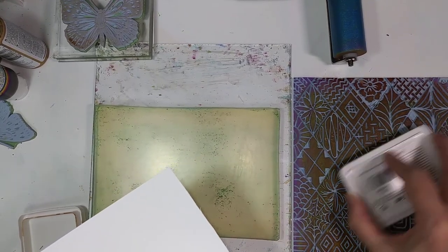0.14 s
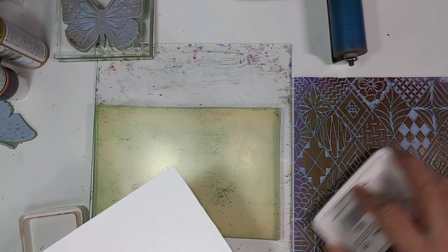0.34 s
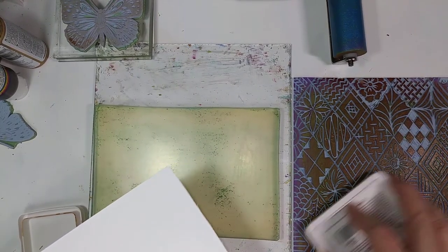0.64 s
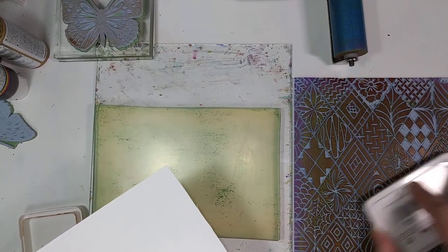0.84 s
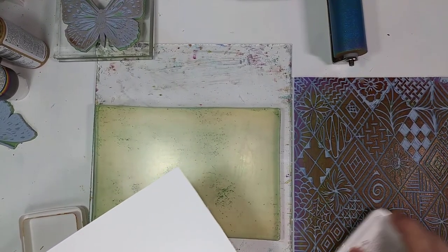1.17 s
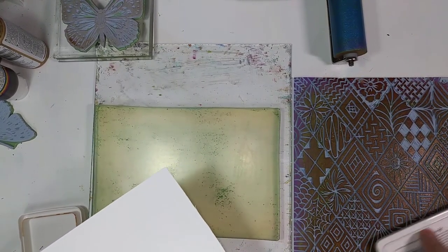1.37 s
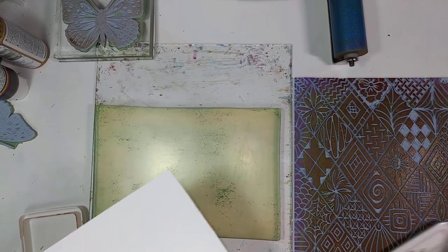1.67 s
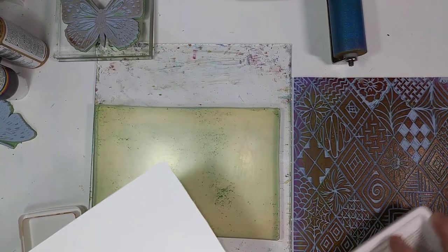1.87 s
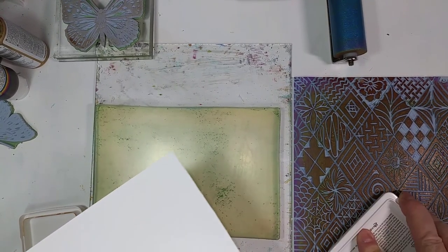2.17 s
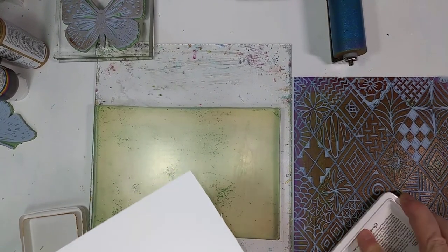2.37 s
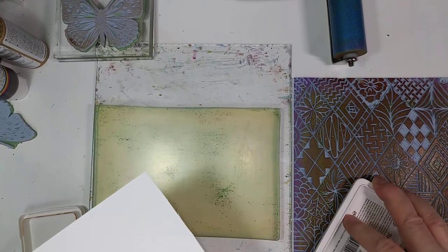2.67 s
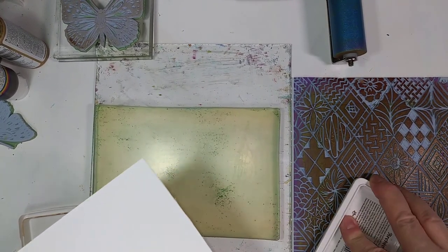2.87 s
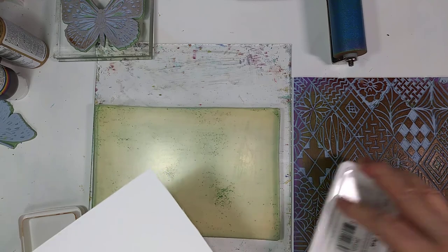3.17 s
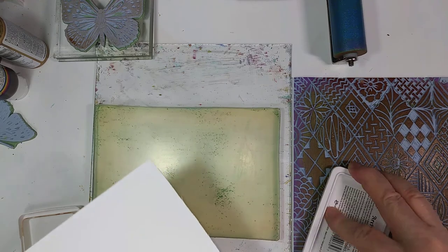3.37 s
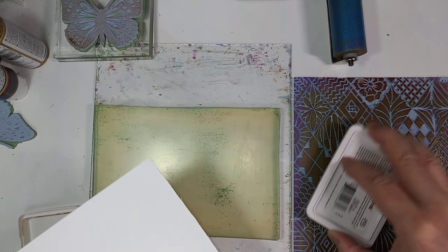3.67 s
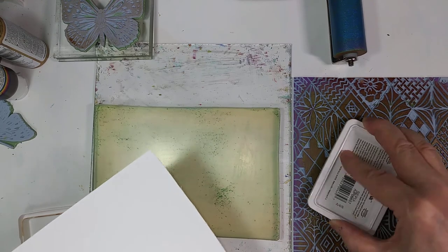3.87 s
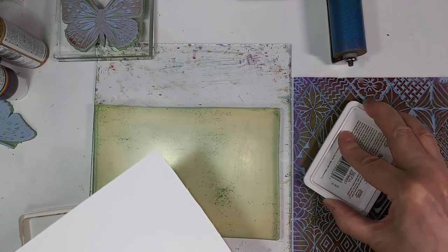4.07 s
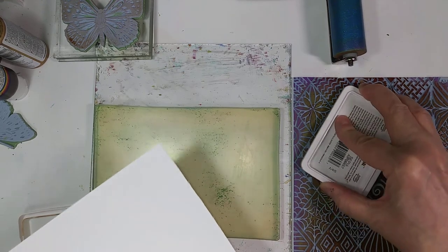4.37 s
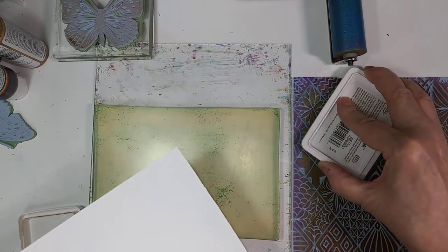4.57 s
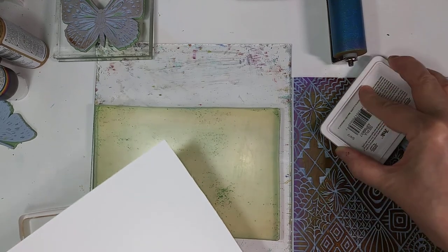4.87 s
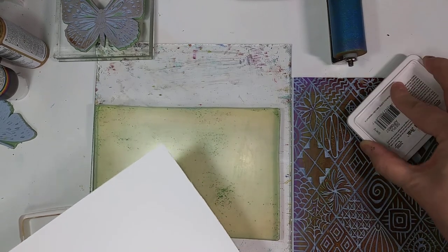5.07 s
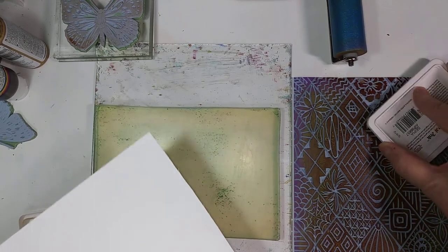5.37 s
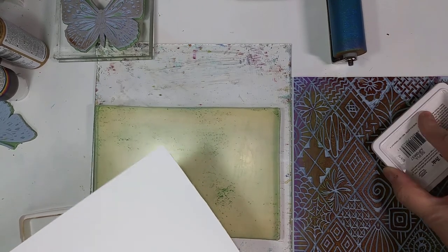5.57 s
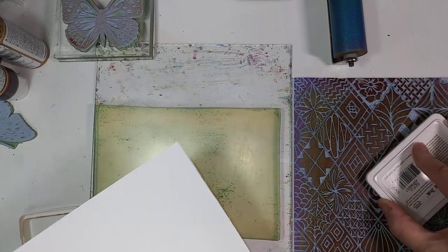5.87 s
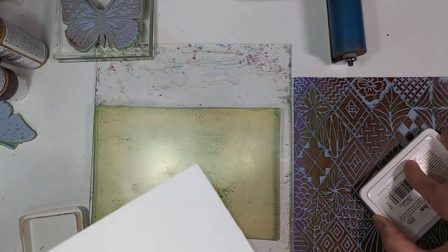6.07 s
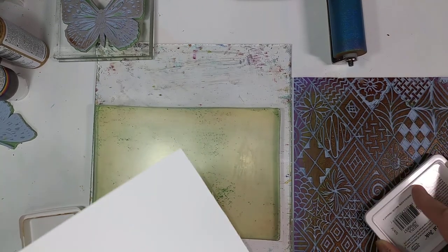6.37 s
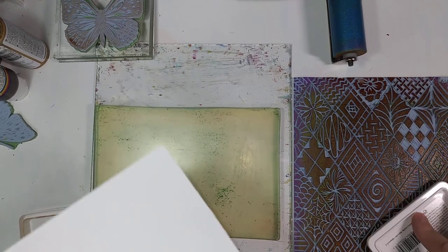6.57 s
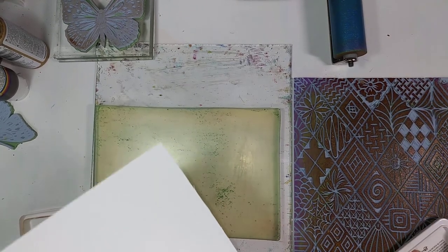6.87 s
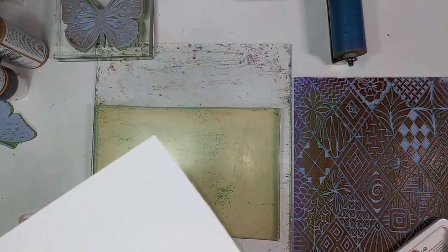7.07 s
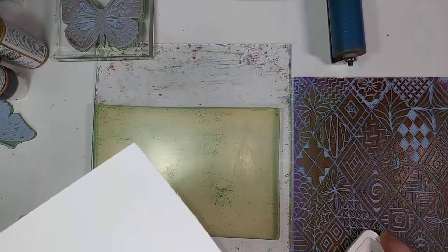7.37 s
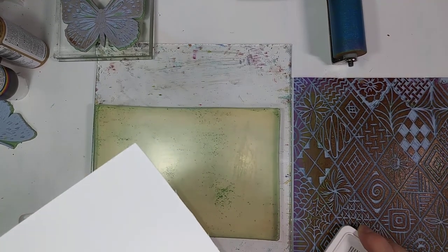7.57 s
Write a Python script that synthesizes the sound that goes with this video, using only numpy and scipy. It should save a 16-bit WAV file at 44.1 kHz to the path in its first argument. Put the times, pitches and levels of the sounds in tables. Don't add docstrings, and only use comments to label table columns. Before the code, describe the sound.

Close by in a small room, hissing ridged rubs give way to about twenty firm dabs, each a plastic clack and dull thump.

```python
import sys
import numpy as np
from scipy import signal
from scipy.io import wavfile
from scipy.ndimage import uniform_filter1d

SR = 44100
rng = np.random.default_rng(int(sys.argv[2]) if len(sys.argv) > 2 else 0)


def bounce(signal):
    frames = np.transpose(np.atleast_2d(signal))
    limited = np.clip(frames, -1, 1)
    pcm = np.round(limited * 32767).astype(np.int16)
    wavfile.write(sys.argv[1], SR, pcm)


def voltage_ratio(decibels):
    exponent = np.asarray(decibels, float) / 20
    return 10 ** exponent


N = 340893
SPAN = 4096


def rms1(x):
    return x / np.sqrt(np.mean(x ** 2))


def band(x, hz, width):
    return signal.lfilter(*signal.iirpeak(hz, hz / width, fs=SR), x)


def steep(x, hz, width):
    return band(band(x, hz, 1.68 * width), hz, 1.68 * width)


def soft(x, hz, leak_db):
    return signal.sosfilt(signal.butter(4, hz, fs=SR, output="sos"), x) + voltage_ratio(leak_db) * x


def peak(x, db):
    return x * voltage_ratio(db) / np.abs(x).max()


def walk(rate):
    hold = int(SR / rate)
    steps = np.repeat(rng.standard_normal(N // 40), hold)[:N]
    return 0.48 * uniform_filter1d(uniform_filter1d(steps, hold), hold)


def add(out, s, hit):
    i = int(s * SR)
    out[i:i + len(hit)] += hit[:N - i]


def strokes(t):
    # fastest at t/s, speeds up/s, slows down/s, hiss/dB, hum over hiss/dB
    swings = [(0.046, 0.1, 0.11, -40.5, -9), (.24, 0.12, 0.1, -41, -10.5), (0.416, 0.11, 0.11, -38.5, -7),
              (.665, 0.2, 0.11, -41.5, -7.5), (0.849, 0.11, 0.092, -38.5, -11.5),
              (1.06, 0.17, 0.11, -40.5, -11), (1.289, 0.15, 0.089, -40, -8.5),
              (1.497, 0.16, 0.12, -42, -9.5), (1.695, 0.13, 0.084, -42, -7.5),
              (1.825, 0.078, 0.037, -53, -25), (2.95, 0.086, 0.04, -54, -5), (3.035, .02, .02, -56.5, -12),
              (4.965, .025, 0.016, -55, -20), (5.19, 0.0088, 0.025, -58, 5), (5.762, .02, 0.057, -62, 10)]
    # t/s, weight/dB
    weight = [
        (0, -56),
        (.13, -62),
        (.25, -60.5),
        (.43, -53),
        (.53, -65),
        (.75, -75.5),
        (1.198, -71),
        (1.65, -61.5),
        (1.9, -86),
    ]
    hiss_power, hum_power, rim_power = 1.95, 1, .3
    rim_db, rim_eases_s, rim_eased_db = -54, .68, -10
    hiss, hum, rim = np.zeros((3, N))
    for s, rise, fall, db, hum_db in swings:
        away = np.where(t < s, (s - t) / rise, (t - s) / fall)
        speed = np.cos(np.pi / 2 * np.clip(away, 0, 1)) ** 2
        hiss += voltage_ratio(db) * speed ** (hiss_power / 2)
        hum += voltage_ratio(db + hum_db) * speed ** (hum_power / 2)
        rim += voltage_ratio(rim_db + db + 39 + rim_eased_db * (s > rim_eases_s)) * speed ** (rim_power / 2)
    s, db = np.transpose(weight)
    drag = voltage_ratio(np.interp(t, s, db)) * np.clip((s[-1] - t) / 0.046, 0, 1)
    return hiss, hum, drag, rim


def rub():
    # f/Hz, width/Hz, level/dB
    felt_modes = [(2100, 1530, 0), (2540, 990, 1.5), (3082, 570, 7.5), (3870, 570, 1.5), (4860, 620, -29),
                  (5440, 914, 11), (6740, 680, 2), (7800, 2100, -9.5), (12100, 830, -26),
                  (13600, 1800, -36)]
    hum_modes = [(430, 64, 0), (670, 83, -2.5), (800, 150, 7), (994, 160, 11.5)]
    drag_modes = [(323, 36, 0)]
    rim_modes = [(1590, 150, 0)]
    chance = rng.standard_normal((4, N))
    slips = chance[0] * voltage_ratio(0.8 * rng.exponential(size=N)) * voltage_ratio(2.3 * walk(400))
    hiss_level, *other_levels = strokes(np.arange(N) / SR)
    fast = hiss_level / hiss_level.max()
    hiss = 0
    for hz, width, db in felt_modes:
        ring = voltage_ratio(db + 1.2 * walk(39.75)) * rms1(steep(slips, hz, width))
        hiss = hiss + ring * np.sqrt(width) * fast ** (0.39 * hz / 8000)
    out = hiss_level * hiss / np.sqrt(np.mean(hiss[fast > .5] ** 2))
    for level, noise, modes in zip(other_levels, chance[1:], (hum_modes, drag_modes, rim_modes)):
        rings = sum(voltage_ratio(db + 1.5 * walk(21)) * rms1(steep(noise, hz, width)) for hz, width, db in modes)
        out = out + level * rms1(rings)
    return out


def room():
    # f/Hz, density/dB per Hz
    spectrum = [(30, -29), (54, -6), (98, -3.5), (239, -6.5), (311, -5.5), (345, -23), (384, -9.5),
                (473, -6.5), (584, -12.5), (1010, -12), (1160, -13), (1250, -10), (2410, -23.5),
                (3670, -20.5), (16000, -41.5)]
    hz, db = np.transpose(spectrum)
    out, swell = 0, walk(2.73)
    for f in 40 * 2 ** np.arange(0, 8.8, .5):
        gain = np.interp(np.log(f), np.log(hz), db) + 2.0 * swell + 7.6 * walk(25)
        out = out + voltage_ratio(gain) * steep(rng.standard_normal(N), f, f / 3)
    return rms1(out) * voltage_ratio(-55)


def crack_rows():
    # t/s, peak/dB, strongest f/Hz, brightness/dB, room send/dB
    landings = [(2.0164, -9, 1590, -12.5, -3.5), (2.6768, -9.5, 5280, -7.5, -3.5),
                (3.25, -16, 2500, -8, 3.5), (3.5749, -11, 2540, -13, -1.5), (3.7808, -13, 1300, -10.5, 2),
                (3.7832, -21, 2230, -9, 3), (4.0357, -24.5, 2420, -8, 6), (4.0423, -25, 1990, -10, 2),
                (4.3046, -20, 1470, -17, 1.5), (4.564, -22, 4940, -30, -5), (4.8018, -22, 5150, -32, -7),
                (5.0467, -20, 2030, -13, 1.5), (5.294, -14.5, 2020, -8.5, -0.5),
                (5.5537, -15, 2100, -10.5, 1.5), (5.8112, -5.5, 2050, -5, -3.5),
                (6.0433, -20, 3240, -17, 2), (6.2805, -21, 2860, -18.5, 14.5), (6.2846, -5, 1600, -15, -1),
                (6.536, -6.5, 1700, -23, -3), (6.8341, -12, 5340, 2.5, 2.7), (6.8363, -18, 1360, -14, -10),
                (7.336, -33, 3170, 20.5, 11), (7.3414, -22.5, 2830, -13, 7), (7.5975, -26, 1440, -11, 5)]
    # t/s, peak/dB, strongest f/Hz, brightness/dB
    clicks = [(2.2897, -44, 1640, -21), (2.407, -44.5, 5600, -6), (2.4997, -46, 2500, -25),
              (2.556, -51, 1720, -20), (2.718, -39, 1410, -6), (2.9405, -45, 2520, -16),
              (3.381, -44, 1520, -13), (4.2986, -36, 2970, -6), (4.4022, -37.5, 2940, -2),
              (4.5715, -31, 2860, -21), (4.659, -47, 5470, 0), (4.824, -41, 1680, -7),
              (4.8423, -35, 1620, -20), (5.185, -55, 1430, 8), (5.9234, -43, 1930, -23),
              (6.134, -44.5, 3360, 15), (6.8454, -29, 2100, -2), (7.3804, -32, 1650, -26),
              (7.5028, -43, 1570, -14)]
    click_send_db = 2
    rows = [*landings] + [(*click, click_send_db) for click in clicks]
    return [(s, db, hz, top_db, 1.21 + 0.0134 * (db + 28), send) for s, db, hz, top_db, send in rows]


def cracks():
    # t/s, peak/dB, strongest f/Hz, brightness/dB, fade/ms, room send/dB
    skims = [
        (1.812, -43.5, 5800, 4, 24, -9),
        (5.752, -43.5, 1900, -26, 12, -9),
    ]
    # f/Hz, width/Hz, level/dB
    rattle = [(1770, 1310, 12.5), (2700, 840, 8), (5070, 730, 11), (6670, 5900, -25), (9300, 12000, -29.5)]
    lead_s = .004
    out, t = np.zeros(N), np.arange(SPAN) / SR
    for row, noise in zip(crack_rows() + [*skims], rng.standard_normal((64, SPAN))):
        s, db, hz, top_db, fade_ms, _ = row
        burst = noise * (1 - np.exp(-t / 0.0024)) * np.exp(-t * 1000 / fade_ms)
        burst = np.roll(burst, int(lead_s * SR)) + voltage_ratio(-41.5) * noise * np.exp(-t / 0.0019)
        case = sum(voltage_ratio(g + (top_db + 11.0) * (f > 4000)) * steep(burst, f, width) for f, width, g in rattle)
        pure = voltage_ratio(14.0 - 0.17 * (db + 14)) * steep(burst, hz, 0.15 * hz)
        add(out, s - lead_s, peak(case + pure, db))
    return out


def thump_rows():
    # t/s, 280-600 Hz peak/dB, 600-1200 Hz peak/dB, strongest f/Hz, room send/dB
    landings = [(2.019, -11.5, -4.5, 917, 0.5), (2.681, -12.5, -12.5, 716, 4.5),
                (3.251, -17.5, -19.5, 407, 11.5), (3.576, -14.5, -12, 698, 6.5), (3.784, -4, -4.5, 474, 0),
                (4.036, -21, -20, 390, 9.5), (4.04, -13, -21, 374, 5.5), (4.305, -11.5, -13, 402, 3.5),
                (4.564, -15.5, -29, 438, 3), (4.574, -19, -22.5, 496, 6), (4.803, -16, -21, 382, 5.5),
                (5.047, -15, -19.5, 410, 6), (5.291, -10.5, -14, 385, 2.5), (5.556, -12.5, -10, 402, 3),
                (5.812, -7, -6, 517, -0.5), (6.043, -17.5, -15, 514, 4.5), (6.286, -9.5, -0.5, 976, 1.5),
                (6.537, -5, 2, 950, -2.5), (6.835, -16, -12, 285, 9), (7.342, -13, -16.5, 403, 8.5),
                (7.379, -31, -23.5, 283, 9.5), (7.596, -6.5, -13.5, 377, -1.5)]
    # t/s, 280-600 Hz peak/dB, strongest f/Hz, table top/dB
    touches = [(2.289, -36.5, 362, -57), (4.299, -30, 285, -33), (4.793, -39, 347, -49),
               (5.038, -23, 403, -46), (5.281, -30, 400, -42), (5.746, -42, 619, -57.5),
               (5.757, -31, 640, -38.5), (5.924, -34, 416, -49.5), (5.185, -43, 700, -60),
               (6.136, -35, 417, -43), (6.476, -40.5, 700, -62), (7.337, -19, 450, -32)]
    table_db, touch_upper_db, touch_send_db = -11, -10, -1.5
    rows = [(s, db, up, db + table_db, hz, send) for s, db, up, hz, send in landings]
    return rows + [(s, db, db + touch_upper_db, low, hz, touch_send_db) for s, db, hz, low in touches]


def thumps():
    # f/Hz, level/dB, t60/s
    body = [
        [(82, -9.5, .1), (145.3, 4, 0.14), (178.3, 6, 0.18), (231, -4, 0.1), (229, 13.5, 0.0067)],
        [(293, -4.5, 0.0065), (388, 1.5, 0.037), (487, -4.5, 0.034)],
        [(732, 5.5, 0.016), (866, 2.5, 0.021), (998, 11, 0.032)],
    ]
    edges = (75, 230, 520, 1150)
    early = (3.5, 1.4, 0.54)
    push_ms, lead_ms, lead_db = .55, 4.4, -23
    main_db, main_t60 = 4.5, 0.067
    out, t = np.zeros(N), np.arange(2 * SPAN) / SR
    for row, noise in zip(thump_rows(), rng.standard_normal((64, 2 * SPAN))):
        s, mid_db, up_db, low_db, hz, _ = row
        push = noise * t ** 2 * np.exp(-t * 1000 / push_ms)
        push = voltage_ratio(lead_db) * push + np.roll(push, int(lead_ms * SR / 1000))
        for k, (group, db) in enumerate(zip(body, (low_db - 4.5, mid_db - 4, up_db - 3))):
            shifts = 1 + .025 * noise[-9 * k - 9:]
            modes = [(f * shift, g, t60) for (f, g, t60), shift in zip(group, shifts)]
            if k == 1 + (hz > 600):
                modes.append((hz, main_db, main_t60))
            blow = 0
            for f, g, t60 in modes:
                mode = np.sin(2 * np.pi * f * t) * np.exp(-np.log(1000) * t / t60)
                blow = blow + peak(signal.fftconvolve(push, mode)[:len(t)], g)
            reach = signal.butter(2, [edges[k], edges[3]], "band", fs=SR, output="sos")
            add(out, s - (lead_ms + early[k]) / 1000, peak(signal.sosfilt(reach, blow), db))
    return out


def tack():
    # t/s, peak/dB
    ticks = [(2.0177, -36), (2.6787, -37), (3.2494, -26), (3.5752, -33.5), (3.6076, -52), (3.7517, -52),
             (3.7813, -30), (3.874, -47), (4.036, -47), (4.0715, -50), (4.2187, -56), (4.324, -42),
             (4.4018, -55), (5.0398, -54), (5.2927, -32.5), (5.5526, -57), (5.7447, -52), (5.811, -34),
             (6.2838, -26.5), (6.4162, -52), (6.535, -36.5), (6.5713, -54.5), (6.8352, -30), (7.3372, -37),
             (7.4214, -44), (7.594, -41), (7.6314, -50)]
    out, t = np.zeros(N), np.arange(SPAN // 8) / SR
    for (s, db), noise in zip(ticks, rng.standard_normal((64, SPAN // 8))):
        add(out, s, peak(steep(noise * np.exp(-t / 0.0012), 9600, 4000), db + 1.5))
    patter = (rng.random(N) < 70 / SR) * voltage_ratio(3.1 * rng.exponential(size=N))
    patter = patter * (np.arange(N) > ticks[0][0] * SR)
    return out + voltage_ratio(-54.5) * steep(patter, 9000, 6000)


def tail():
    # f/Hz, width/Hz, early/dB, early t60/s, late/dB, late t60/s
    bands = [(61.4, 13, -34, 0.09, -26, 0.43), (140.6, 13, -17, 0.2, -24, 0.73),
             (181, 114, -13.5, 0.26, -13.5, 0.3), (385, 217, -22.5, 0.096, -35, 0.3),
             (463, 430, -26.5, 0.18, -38.5, 0.41), (730, 170, -25, 0.064, -32.5, 0.16),
             (945, 440, -25.5, 0.062, -30.5, 0.3), (1600, 540, -34.5, 0.14, -39, 0.28),
             (2100, 310, -26.5, 0.04, -37.5, 0.25), (3130, 2800, -28, 0.032, -32, 0.27),
             (4900, 3700, -18, 0.019, -34, 0.38), (9500, 4500, -41, 0.044, -51.5, 0.27)]
    thud_db = 7
    thump, crack, out = np.transpose(thump_rows()), np.transpose(crack_rows()), 0
    flutter = 2.8 * walk(160)
    for hz, width, early_db, early_t60, late_db, late_t60 in bands:
        if hz < 1800:
            column = 3 if hz < 280 else 1 if hz < 600 else 2
            s, db = thump[0], thump[column] + thump[5] - thud_db * (hz < 280)
        else:
            s, db = crack[0], crack[1] + crack[5] + .6 * crack[3] * (hz > 4000)
        kicks = np.zeros(N)
        np.add.at(kicks, np.minimum((s + 0.0052) * SR, N - 1).astype(int), voltage_ratio(2 * db))
        power = 0
        for g, t60 in ((early_db, early_t60), (late_db, late_t60)):
            power = power + voltage_ratio(2 * g) * signal.lfilter([1], [1, -voltage_ratio(-120 / t60 / SR)], kicks)
        level = np.sqrt(np.abs(uniform_filter1d(power, size=150)))
        lumps = voltage_ratio(0.49 * walk(82) + flutter)
        out = out + level * lumps * rms1(steep(rng.standard_normal(N), hz, width))
    return out


def scene():
    dabs = soft(cracks(), 7830, -35.5) + thumps() + soft(tack(), 10500, -23.5)
    return (rub() + room() + dabs + soft(tail(), 7400, -10))[None]


def low_pass(x):
    return signal.sosfilt(signal.butter(12, 16370, fs=SR, output="sos"), x)


def record(dry):
    # t/s, stays shut/ms, depth/dB
    gaps = [(.719, 25, -3), (.92, 21, -3), (1.565, 15, -5.5), (1.873, 38, -9), (1.926, 3.2, -14),
            (2.255, 21, -5.5), (2.389, 2.8, -7), (2.575, 88.2, -12), (2.61, 6, -8), (2.998, 39, -6.5),
            (3.088, 33, -14), (3.121, 110.4, -10.5), (3.178, 57.3, -7.5), (3.498, 64.2, -13),
            (3.998, 20.3, -14.5), (4.266, 17, -7), (4.519, 33.2, -10), (4.539, 8.9, -11), (4.777, 1.6, -8),
            (5.004, 20, -11), (5.52, 11, -11.5), (6.008, 7.6, -14), (6.225, 20, -3), (6.779, 40.8, -16.5),
            (7.262, 51, -18), (7.545, 37.8, -4.5)]
    fall_ms, open_ms = 14.3, 3
    t = np.arange(N) / SR
    low_cut = signal.butter(4, 45, "high", fs=SR, output="sos")
    top_cut = signal.ellip(8, .2, 60, 15850, fs=SR, output="sos")
    shut_db = 0
    for s, hold_ms, db in gaps:
        corners = s + np.cumsum([0, fall_ms, hold_ms, open_ms]) / 1000
        shut_db = shut_db + np.interp(t, corners, [0, db, db, 0])
    heard = dry - 0.55 * band(dry, 1242, 770)
    mix = signal.sosfilt(np.vstack([low_cut, top_cut]), heard) * voltage_ratio(shut_db)
    return low_pass(mix)


dry = scene()
out = record(dry)
bounce(out)
```